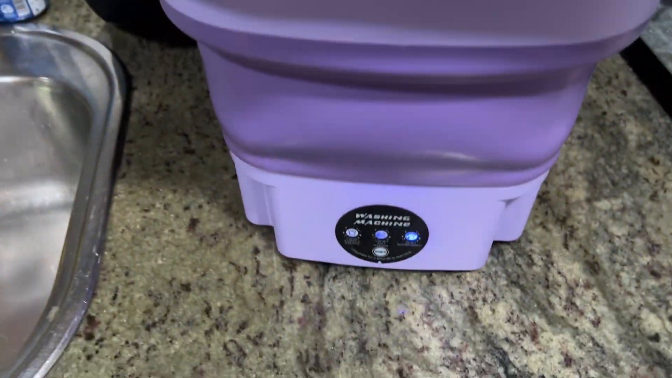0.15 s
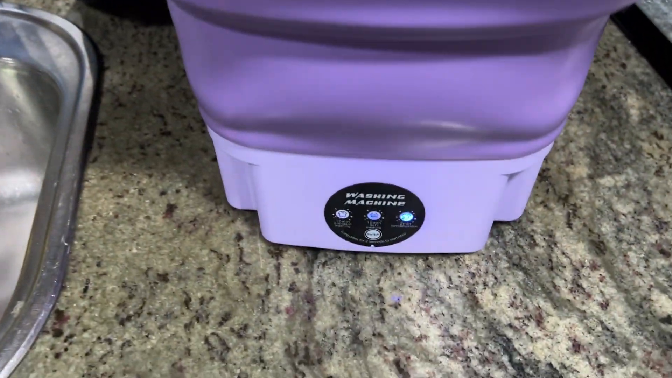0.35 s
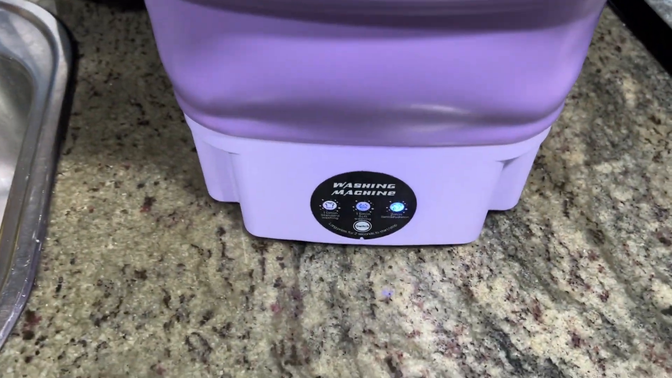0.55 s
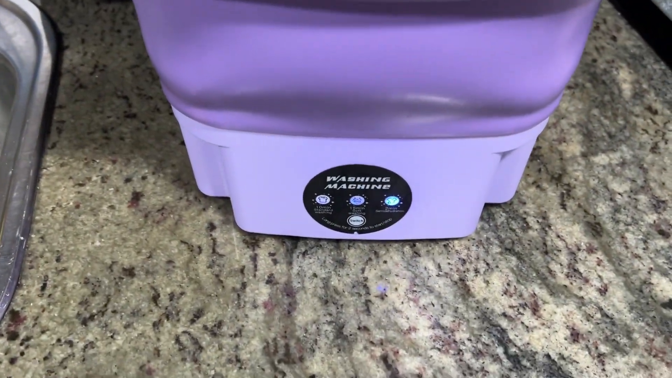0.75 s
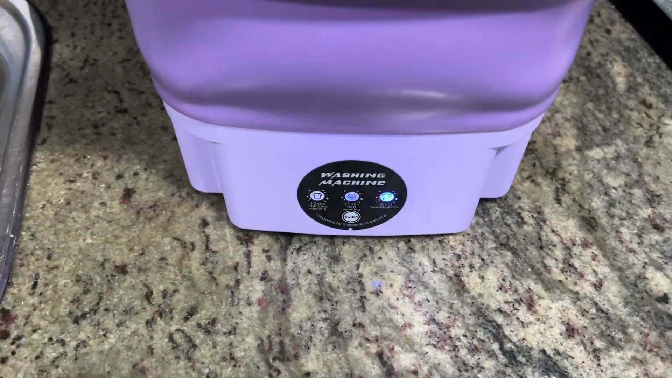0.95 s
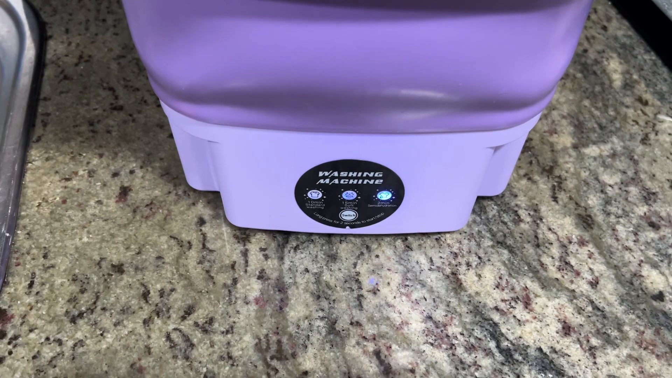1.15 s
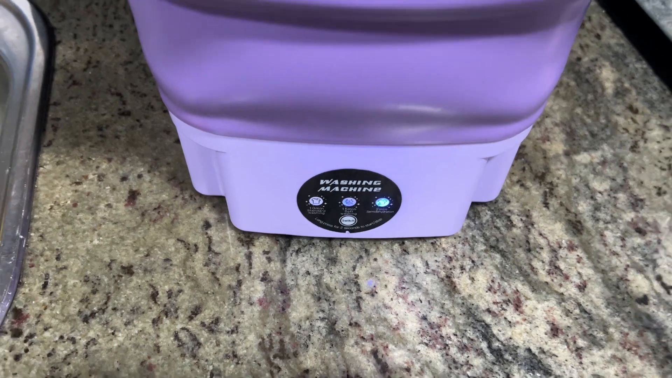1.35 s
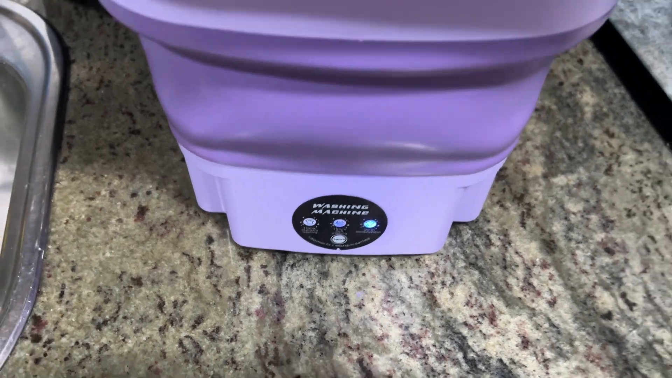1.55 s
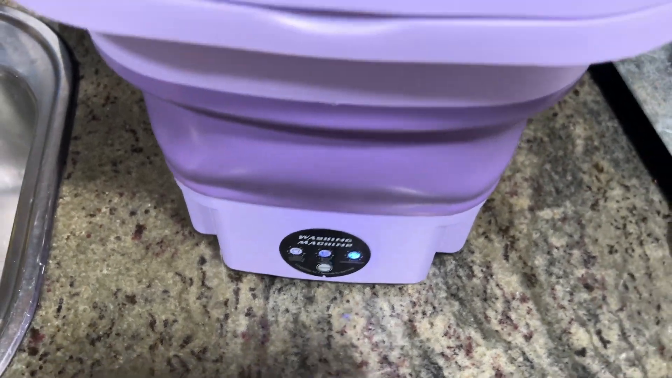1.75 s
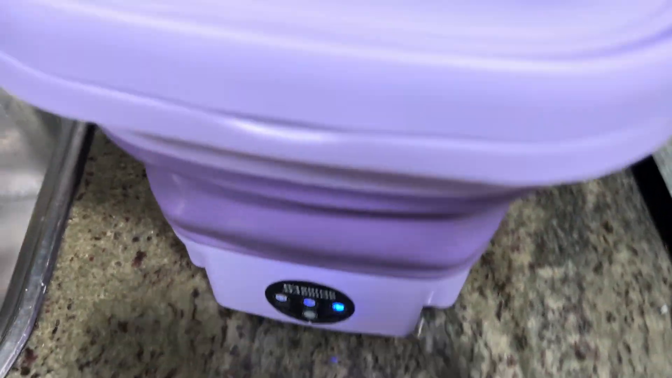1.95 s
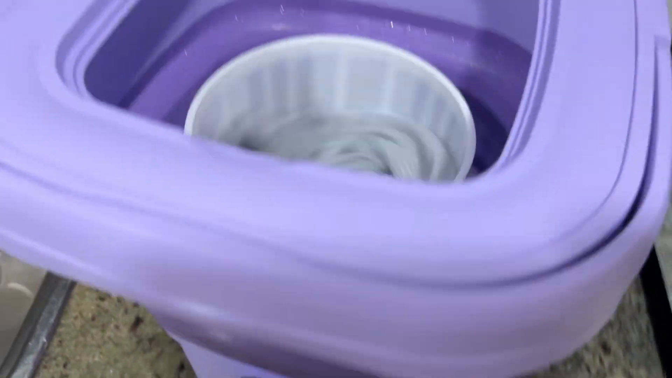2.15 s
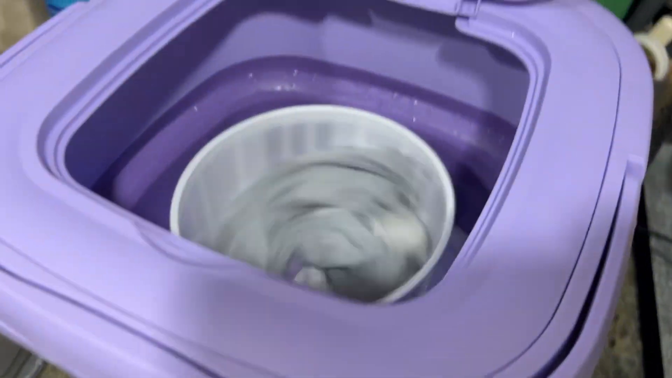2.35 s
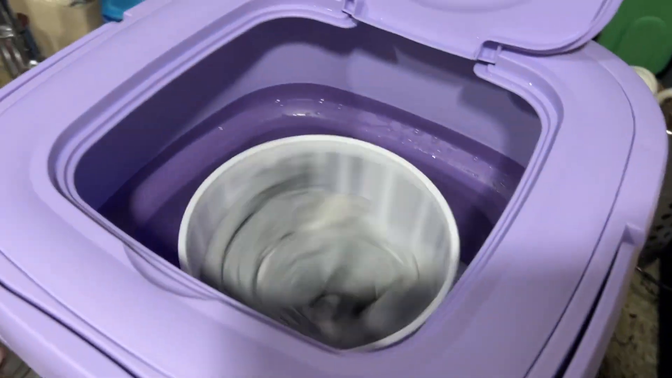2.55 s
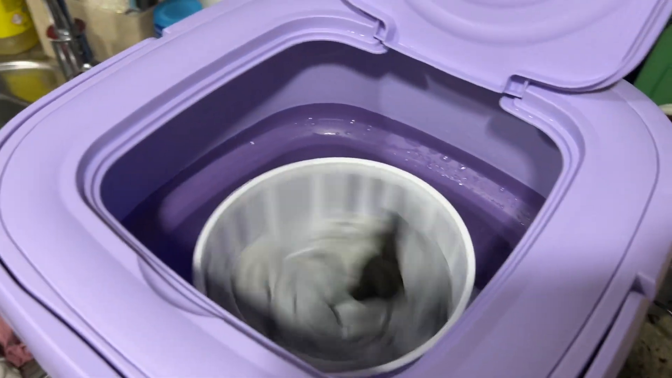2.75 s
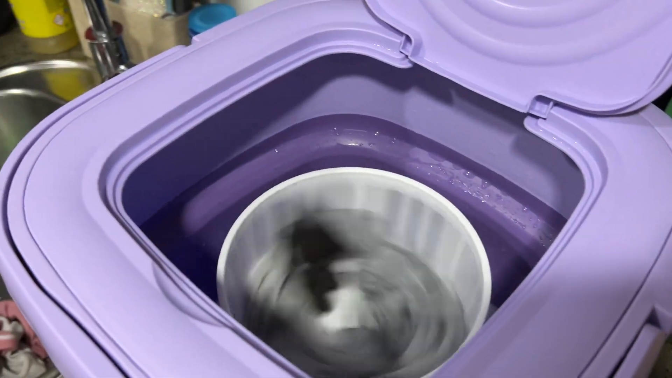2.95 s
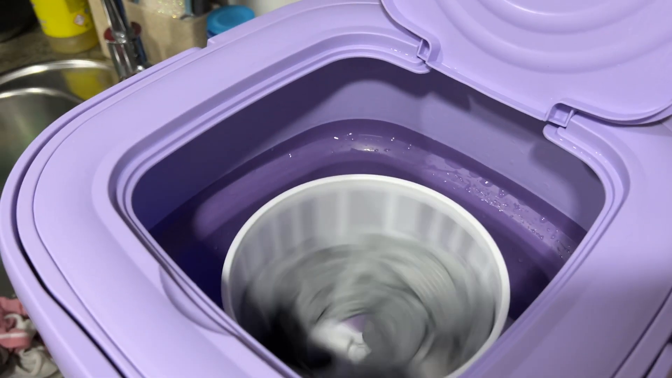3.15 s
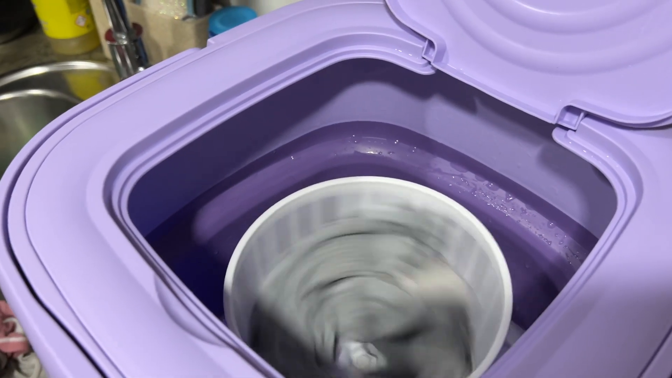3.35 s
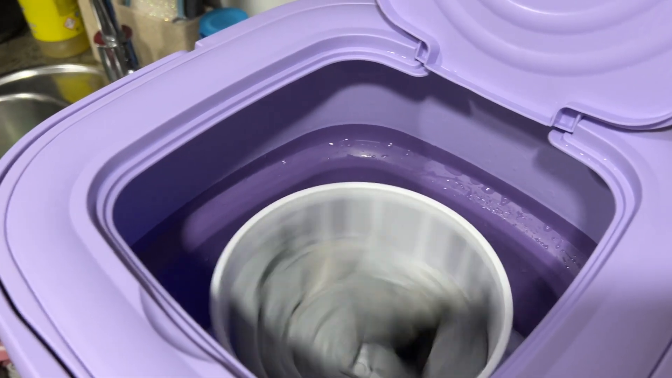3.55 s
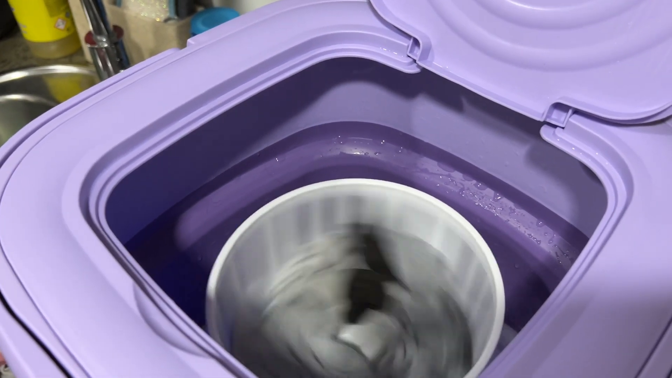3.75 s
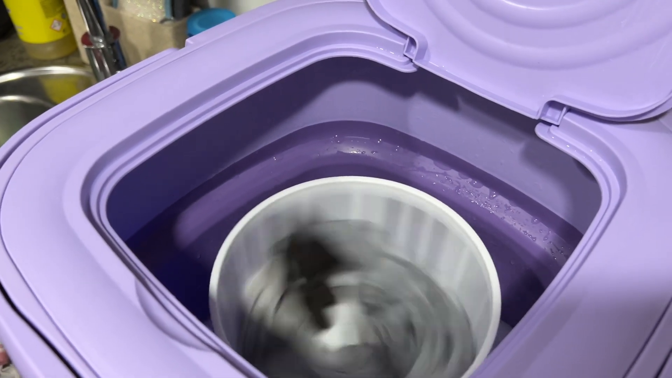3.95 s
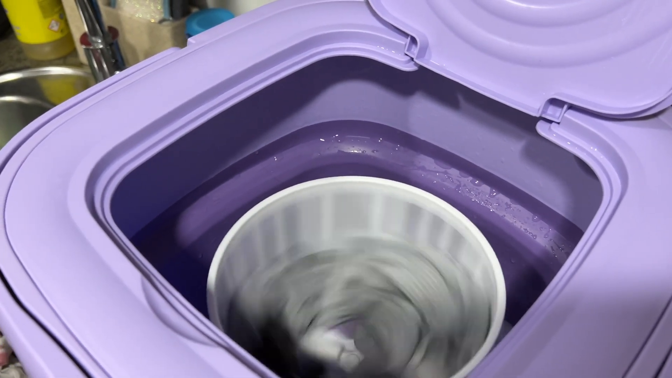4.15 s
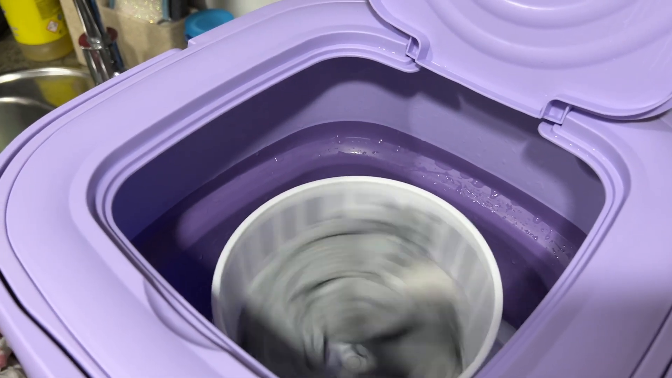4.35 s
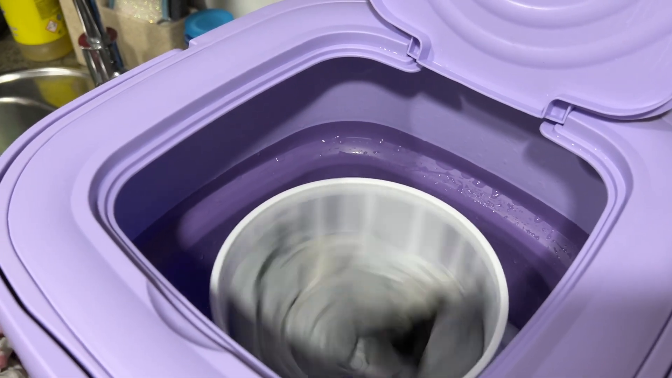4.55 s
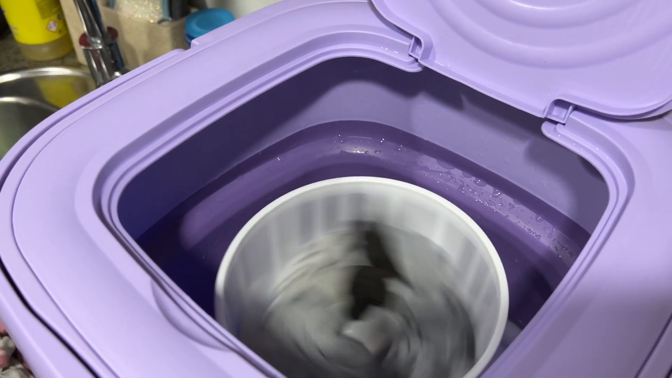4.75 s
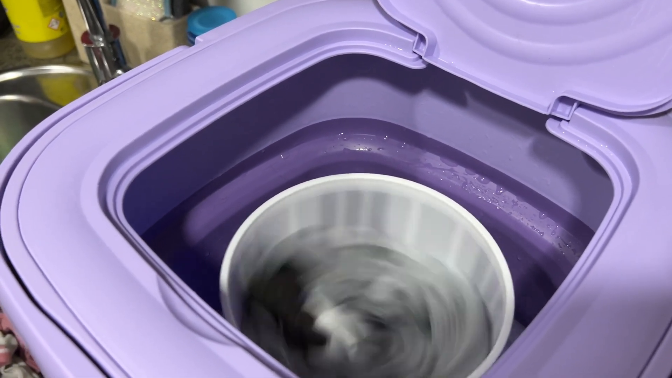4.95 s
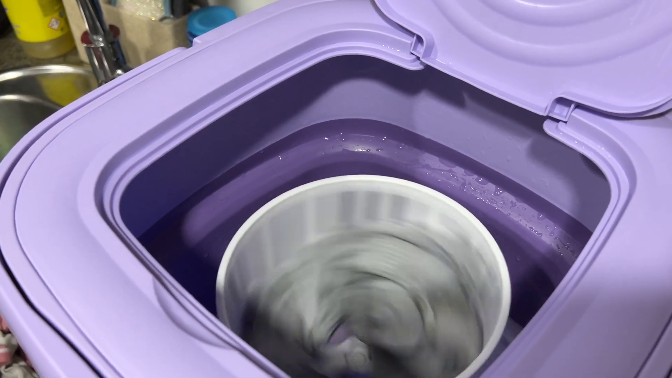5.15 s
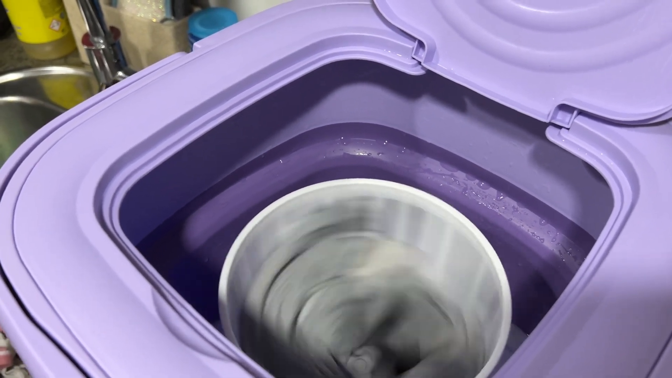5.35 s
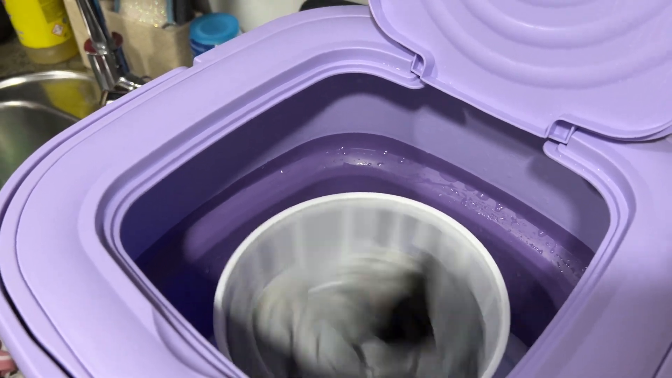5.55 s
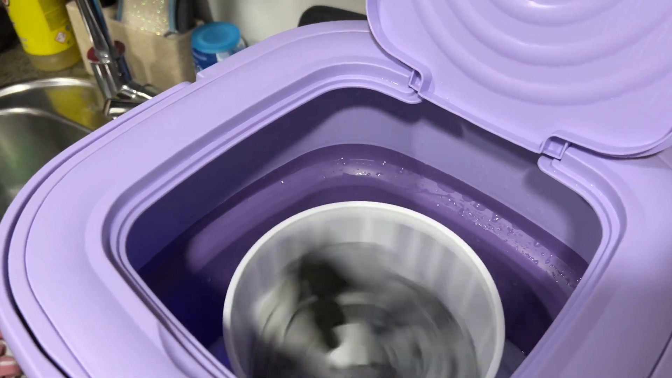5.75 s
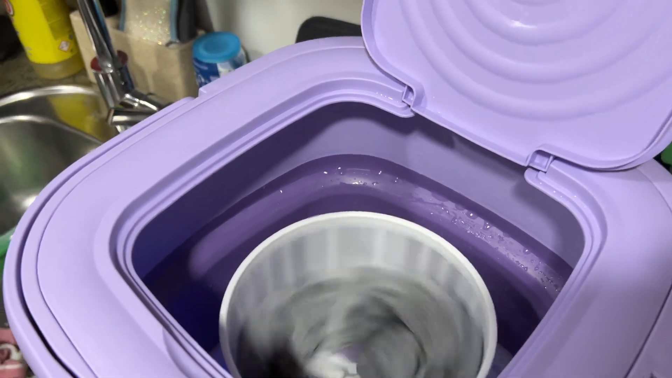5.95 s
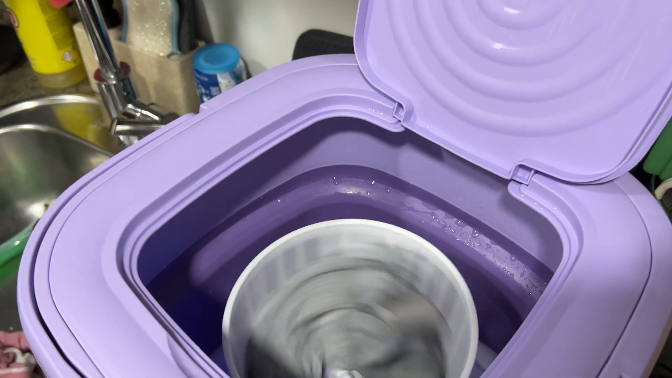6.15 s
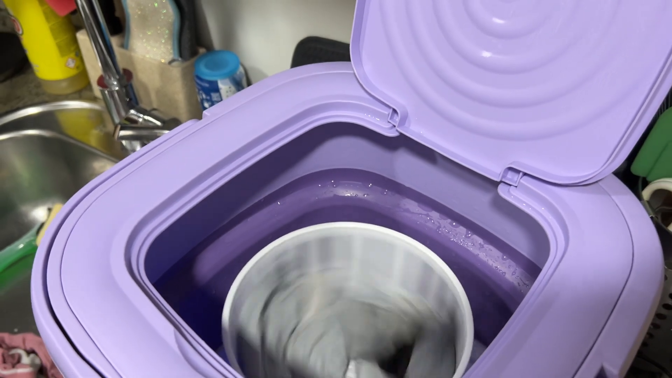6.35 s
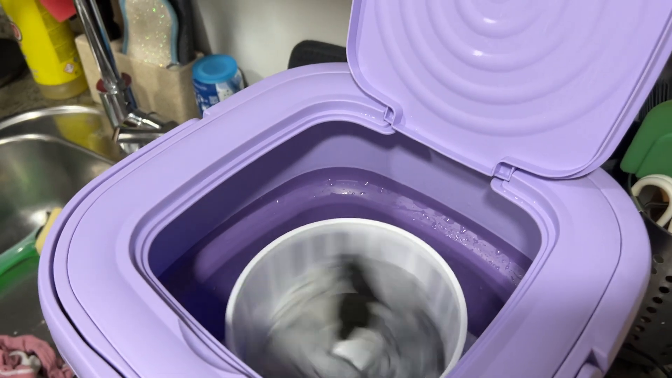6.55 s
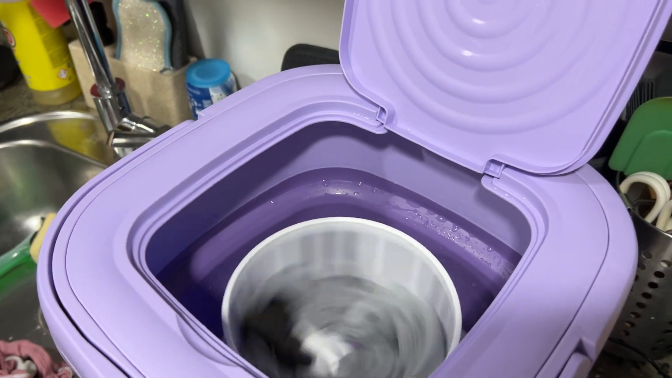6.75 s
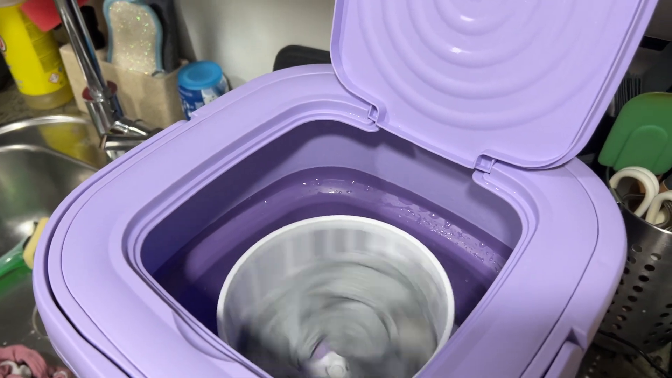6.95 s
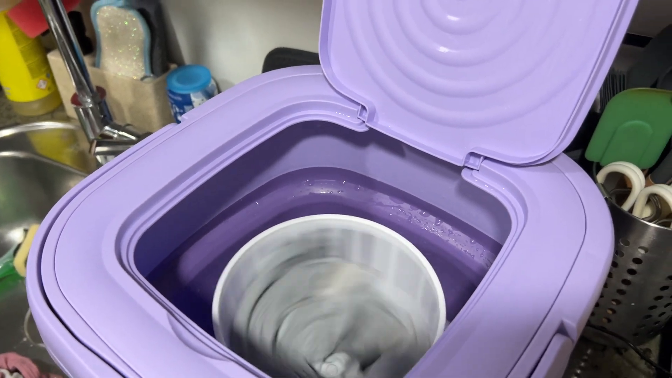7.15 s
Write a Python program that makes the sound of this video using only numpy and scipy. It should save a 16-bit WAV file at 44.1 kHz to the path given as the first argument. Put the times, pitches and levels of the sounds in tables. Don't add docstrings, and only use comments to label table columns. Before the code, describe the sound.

Close handheld stereo pickup of a portable mini washer in a quiet kitchen. Its motor gears drone at a constant low pitch, with loose plastic buzzing and squeaky chirps pulsing many times a second. After nearly two seconds of side-on sound, dull handling knocks mark a move above the tub, where the drone swells and resonates. A brief faint whistle and tiny shell ticks pass over the continuous spin.

```python
import sys
import numpy as np
from scipy import signal
from scipy.fft import rfft, irfft, next_fast_len
from scipy.io import wavfile
from scipy.ndimage import uniform_filter1d

SR = 44100
rng = np.random.default_rng(int(sys.argv[2]) if len(sys.argv) > 2 else 0)


def makeup_ratio(level_db):
    decades = np.asarray(level_db, float) / 20
    return 10 ** decades


def log_audio(samples):
    frames = np.atleast_2d(samples).T
    limited = np.clip(frames, -1, 1)
    pcm = np.round(limited * 32767).astype(np.int16)
    wavfile.write(sys.argv[1], SR, pcm)


N = 317520
T = np.arange(N) / SR
SIZE = next_fast_len(N)
HZ = np.maximum(np.arange(SIZE // 2 + 1) * SR / SIZE, 1)
MESH_HZ, DRUM_HZ, IDLER_HZ = 249.9, 6.11, 14.88
SIDE = np.array([[0.5], [-0.5]])


def between(pair, share):
    return pair[0] + (pair[1] - pair[0]) * share


def midway(share):
    return 4 * share * (1 - share)


def over_hz(table):
    hz, value = np.transpose(table)
    return np.interp(np.log(HZ), np.log(np.maximum(hz, 1)), value)


def unit(x):
    return x / np.sqrt(np.mean(x ** 2))


def walk(rate_hz):
    hold = int(SR / rate_hz)
    steps = np.repeat(rng.standard_normal(N // hold + 1), hold)
    return unit(uniform_filter1d(uniform_filter1d(steps, hold), hold)[:N])


def ports(near, other):
    # hz, likeness_0_1
    likeness = [(40, 1), (110, 0.75), (300, 1), (700, 0.63), (1400, 0.65), (2400, 0.5), (3500, 0.29),
                (6000, -0.1), (7500, 0.5), (9000, 0.1), (15000, 13)]
    # hz, lead_rad
    port_lead = [(0, 0), (690, .6), (1030, 0), (1890, -.1), (3270, 1.9), (4050, 2.8), (4480, .1),
                 (5680, -.4), (7200, -.4), (8200, -1.7), (10100, -np.pi), (13500, -2 * np.pi),
                 (15700, -8.6)]
    # hz, left_minus_right_db
    port_tilt = [(60, -2), (110, 0.5), (200, -0.39), (380, -0.5), (700, -2.5), (1290, 3.5), (2380, -3),
                 (4400, 4.2), (8120, 3), (15000, 0)]
    alike = np.clip(over_hz(likeness), 0, 1)
    lag = np.exp(-1j * np.interp(HZ, *np.transpose(port_lead)))
    right = alike * near * lag + np.sqrt(1 - alike ** 2) * other
    tilt = makeup_ratio(over_hz(port_tilt) / 2)
    return irfft(np.array([near * tilt, right / tilt]), SIZE)[:, :N]


def phone_path():
    # time_s, mouth_in_view_0_1, nearness_db
    positions = [(0, 0.06, -1), (.6, 0.02, 0), (1.15, .02, 0.5), (1.62, .135, 0), (1.9, .25, 0),
                 (2.3, .7, 0), (2.8, 1, -1), (3.3, 1, 0), (5.5, 1, 0), (6.4, 1, -1.5), (7.2, 1, -3)]
    s, above, near_db = np.transpose(positions)
    return np.clip(np.interp(T, s, above), 0, 1), np.interp(T, s, near_db)


def tooth_load():
    # drum_multiple, idler_multiple, angle_rad, swing_db
    beats = [(1, 0, -1.7, 1.58), (2, 0, -2.0, 1.5), (0, 1, -1.4, 3.5), (1, 1, 3, 2.13), (-1, 1, 3.0, 0.9),
             (2, 1, 3.5, 1.7), (3, 0, -3, 0.6), (4, 0, 3.5, 0.46)]
    load_db = 0.23 * walk(25) + 0.37 * walk(70)
    for drum, idler, rad, swing_db in beats:
        beat_hz = drum * DRUM_HZ + idler * IDLER_HZ
        load_db = load_db + swing_db * np.cos(2 * np.pi * beat_hz * T + rad)
    return load_db


def hum(mesh, above, near_db):
    # mesh_order, level_db, left_minus_right_db, left_lead_rad
    flank_path = [(1, -54.5, -1, 0.3), (2, -47.3, -5.5, .9), (3, -53.5, 2, 1.3), (4, -90, -14, 2.1),
                  (6, -63, -4, 2.8), (7, -74, 10, 1), (9, -91, 7, .05), (12, -77.5, 11, 1.7)]
    mouth_path = [(1, -48, 0.6, 0.082), (2, -31, 1.15, .16), (3, -53.5, 17, 2.6), (4, -88, 12, -1.3),
                  (6, -70, -8, -1.9), (7, -60.5, -.5, -.89), (9, -91, 1.5, .13), (12, -68.5, -11, 1.1)]
    tub_order, tub_lead_rad = 2, 2.75
    rim_order, rim_echo_db = 3, 4.5
    drum = 2 * np.pi * DRUM_HZ * T
    rock_db = 0.84 * np.cos(drum + 0.26) + 0.38 * np.cos(2 * drum + 1.2) + 0.46 * np.cos(4 * drum - 1.1)
    out = np.zeros((2, N))
    for flank, mouth in zip(flank_path, mouth_path):
        order = flank[0]
        shake_db = rock_db + near_db + 0.025 * order ** 2 * walk(40)
        if order == rim_order:
            shake_db = shake_db + rim_echo_db * midway(above)
        angle = order * (mesh + 0.055 * np.cos(drum - 0.93) + 0.0093 * order * walk(60) + 1.127)
        flank_lag_rad = tub_lead_rad if order == tub_order else 0
        for share, lag_rad, path in ((np.sqrt(1 - above), flank_lag_rad, flank), (above, 0, mouth)):
            _, level_db, pan_db, lead_rad = path
            gain = np.sqrt(2) * share * makeup_ratio(level_db + shake_db + SIDE * pan_db)
            out = out + gain * np.sin(angle - lag_rad + SIDE * lead_rad)
    return out


def rattle(mesh, load_db, sight, near_db):
    # hz, swing_share
    swing_bands = [(300, 0.3), (700, 0.33), (1300, .1), (2300, 0.35), (2950, .05), (3600, 0.62),
                   (5000, 0.75), (7500, 0.65), (12000, 0.33)]
    # hz, beside_db_per_hz, above_db_per_hz
    case_floor = [(175, -81, -81.5), (216, -69.5, -69.5), (480, -72.5, -70.5), (630, -88, -76.5),
                  (1110, -71, -73), (2530, -82, -75.5), (3220, -79, -76.5), (4600, -83.5, -83),
                  (5800, -91.5, -90.5), (8000, -93, -89.5), (9400, -92.5, -93), (12670, -86, -87),
                  (15700, -91, -92.5)]
    # hz, width_hz, beside_db, above_db
    shell_modes = [(361.5, 45, -70.5, -65), (818, 94, -60, -61.5), (920.5, 31, -61.5, -62),
                   (1007, 40, -62.5, -64), (1190, 60, -87, -65), (1230, 61, -63.5, -59.5),
                   (1420, 90, -96, -79), (1498, 26, -65, -58.5), (1749, 44, -62, -64.5),
                   (1862, 68, -64.5, -66), (1988, 91, -64, -63.5), (2495, 89, -80, -66),
                   (2256, 40, -66, -70.5), (2734, 62, -77, -67.5), (2802, 27, -83, -64),
                   (2860, 95, -70, -77.5), (3230, 40, -67.5, -73.5), (3436, 100, -81, -70),
                   (3817, 99, -73.5, -74.5), (4166, 103, -76, -76), (4440, 20, -79, -78),
                   (5770, 47, -79.5, -79.5), (6200, 63, -85, -81), (12000, 200, -80, -98)]
    case_db, treble_db = (-1.95, 0.37), (-4, 2)
    swing_seen = between((0.75, 1), sight)
    rim_shade_db = -2.5
    tooth = 1 + 0.095 * np.cos(mesh + 1.0)
    knocks = rng.standard_normal((2, N)) * makeup_ratio(1.27 * rng.exponential(size=(2, N))) * tooth
    centres = np.log([hz for hz, _ in swing_bands])
    drive = 0
    for j, (hz, share) in enumerate(swing_bands):
        bright = np.clip((hz - 2500) / 8000, 0, 1)
        heard_db = (1 - bright) * between(case_db, sight) + bright * between(treble_db, sight)
        heard_db = heard_db + 0.72 * near_db + rim_shade_db * midway(sight)
        band = np.interp(np.log(HZ), centres, np.arange(len(swing_bands)) == j)
        swing_db = share * swing_seen * load_db + 1.2 * walk(60) + 1.0 * walk(35)
        drive = drive + band * rfft(unit(knocks * makeup_ratio(swing_db)) * makeup_ratio(heard_db), SIZE)
    views = []
    for view in (0, 1):
        power = makeup_ratio(2 * over_hz([(hz, db[view]) for hz, *db in case_floor]))
        for hz, width_hz, *db in shell_modes:
            power = power + makeup_ratio(2 * db[view]) / (1 + (2 * (HZ - hz) / width_hz) ** 2) ** 1.58
        views.append(ports(*(drive * np.sqrt(power))))
    return makeup_ratio(33) * (np.sqrt(1 - sight) * views[0] + np.sqrt(sight) * views[1])


def mesh_chirp(mesh, load_db, sight, near_db):
    # mesh_order, waver_beside_rad, waver_above_rad, gate_beside_db, gate_above_db,
    # level_beside_db, level_above_db, left_minus_right_db; negative gate speaks between load peaks
    chirps = [(5, .6, 1.0, -8, -1.5, -52, -56.5, 3), (10, .6, 1.3, 8, 7, -56, -55.5, -4),
              (20, 1.1, 1.5, 9, 11, -68, -64.5, 3), (30, 1.0, 1.5, 9, 8, -75, -80, 2)]
    beams = [2.8, -2.1, -0.13, 0.74]
    # drum_multiple, angle_rad, swing_db
    sways = [(2, -.9, 2.5), (1, 2.8, 2.2), (2, -2.6, 1.5), (1, 0, .1)]
    chirp_db, rim_shade_db = 2, -5
    heard_db = chirp_db + rim_shade_db * midway(sight)
    out = np.zeros((2, N))
    for (order, *pairs, pan_db), beam, (turns, rad, sway_db) in zip(chirps, beams, sways):
        waver_rad, gate_db, level_db = (between(pairs[j:j + 2], sight) for j in (0, 2, 4))
        angle = order * mesh + waver_rad * walk(110) + 0.44 * np.array([walk(60), walk(60)])
        contact = np.tanh((load_db - 0.5 + 0.8 * walk(70)) / 1.5)
        level_db = level_db + gate_db * (contact - np.sign(gate_db)) + heard_db + beam * near_db
        level_db = level_db + sway_db * sight * np.cos(2 * np.pi * turns * DRUM_HZ * T + rad)
        level_db = level_db + 1.5 * walk(120) + 1.3 * walk(45) + 1.4 * walk(18)
        out = out + np.sqrt(2) * makeup_ratio(level_db + SIDE * pan_db) * np.sin(angle)
    return out


def bearing_whistle():
    whistle_hz, level_db, fade_db_per_s = 7072, -67, 18
    start_s, end_s, ramp_s = 3.58, 3.9, 0.03
    age_s = T - start_s
    ramp = np.clip(np.minimum(age_s, end_s - T) / ramp_s, 0, 1)
    blow = ramp * makeup_ratio(level_db - fade_db_per_s * age_s)
    return np.sqrt(2) * blow * np.sin(2 * np.pi * whistle_hz * T) * np.array([[1.6], [0.3]])


def handling():
    # start_s, peak_db, ring_hz, t60_s
    bumps = [
        (1.795, -40, 55, .12),
        (1.862, -41, 60, .12),
        (1.884, -37, 135, .07),
        (1.905, -42, 60, .15),
        (1.99, -40, 70, .1),
        (2.47, -44, 42, .2),
        (6.50, -42, 42, .2),
    ]
    # start_s, peak_db
    ticks = [
        (1.579, -56),
        (3.286, -53),
        (3.777, -51),
    ]
    tick_t60_s = 0.012
    out = np.zeros((2, N))
    for start_s, peak_db, ring_hz, t60_s in bumps:
        age_s = np.maximum(T - start_s, 0)
        envelope = makeup_ratio(peak_db - 60 * age_s / t60_s) * (1 - np.exp(-ring_hz * age_s))
        out += envelope * np.sin(2 * np.pi * ring_hz * age_s)
    for start_s, peak_db in ticks:
        age_s = T - start_s
        envelope = (age_s > 0) * makeup_ratio(peak_db - 60 * np.abs(age_s) / tick_t60_s)
        out += envelope * rng.standard_normal((2, N))
    return out


def rumble():
    # hz, db_per_hz
    room_noise = [(12, -26.5), (20, -14), (37, 2), (48, -2), (124, -9.5), (140, -11.5), (167, -14),
                  (200, -11.5), (260, -39), (440, -120)]
    # centre_s, length_s, extra_rumble_db
    moves = [
        (1.75, .5, 0.5),
        (2.5, .25, 1.5),
        (4.9, 0.56, 1),
    ]
    rumble_db = -63
    highpass = HZ ** 4 / (HZ ** 4 + 30 ** 4)
    low = rfft(rng.standard_normal((2, N)), SIZE) * makeup_ratio(over_hz(room_noise)) * (HZ < 215) * highpass
    moving_db = sum(db * np.exp(-((T - s) / length_s) ** 2) for s, length_s, db in moves)
    return unit(ports(*low)) * makeup_ratio(rumble_db + moving_db)


def scene():
    above, near_db = phone_path()
    sight = np.clip(above / 0.51, 0, 1)
    mesh = 2 * np.pi * np.cumsum(MESH_HZ + 0.1935 * walk(1.0)) / SR
    load_db = tooth_load()
    machine = hum(mesh, above, near_db) + rattle(mesh, load_db, sight, near_db)
    machine = machine + mesh_chirp(mesh, load_db, sight, near_db) + bearing_whistle()
    return machine + handling() + rumble()


def band_limit(x):
    return signal.sosfilt(signal.butter(12, 15750, fs=SR, output="sos"), x)


def record(dry):
    return band_limit(dry)


dry = scene()
out = record(dry)
log_audio(out)
```